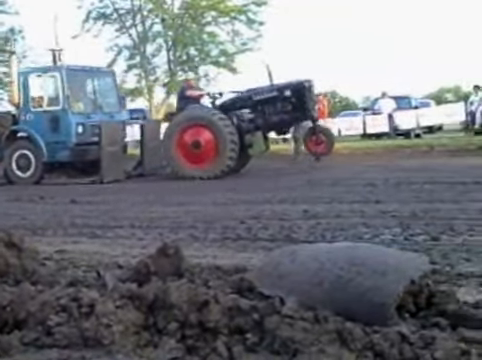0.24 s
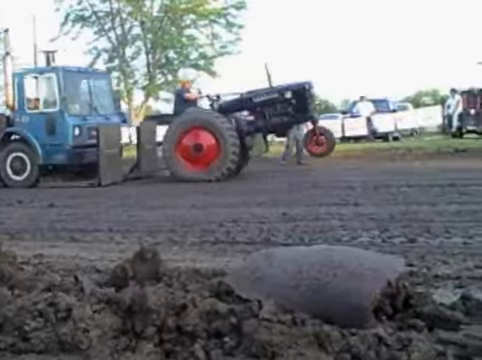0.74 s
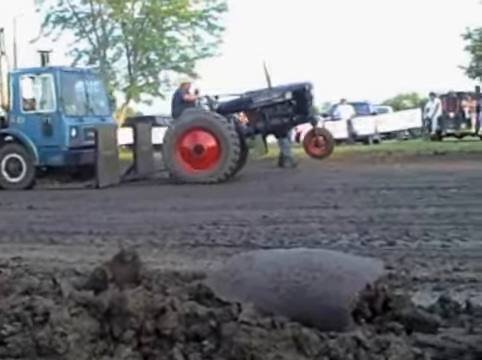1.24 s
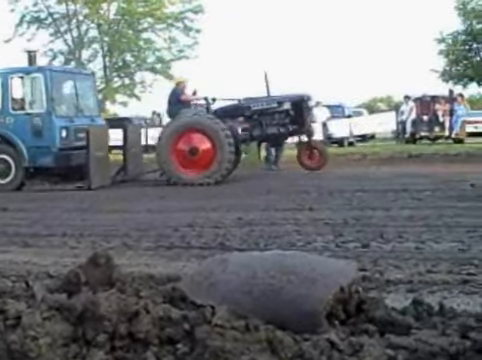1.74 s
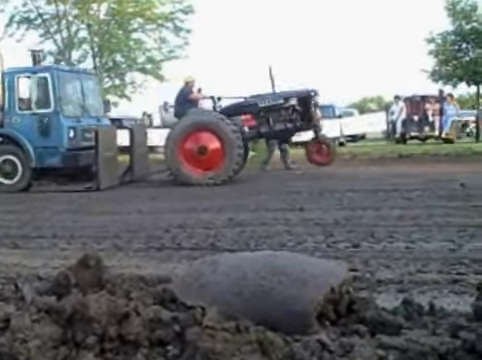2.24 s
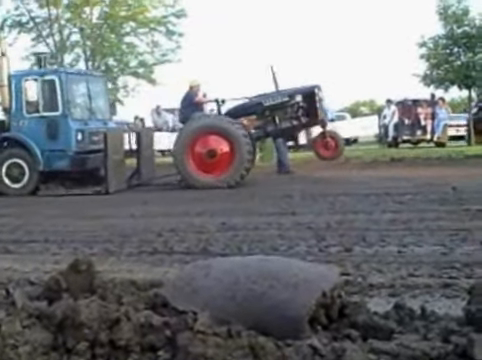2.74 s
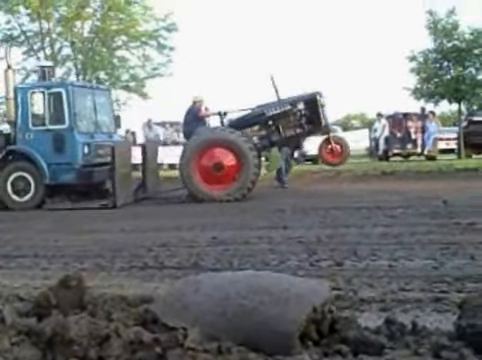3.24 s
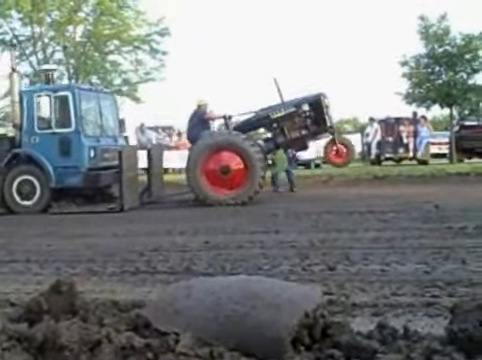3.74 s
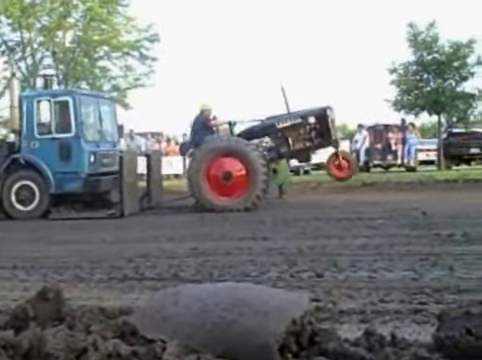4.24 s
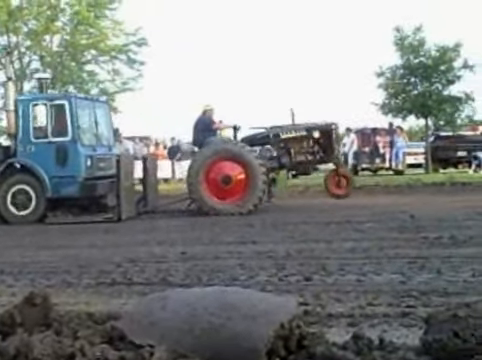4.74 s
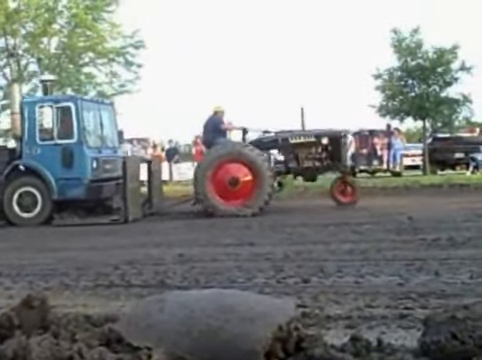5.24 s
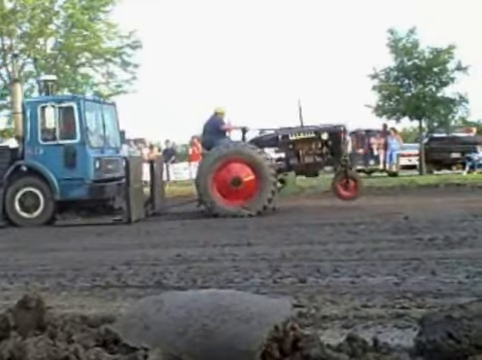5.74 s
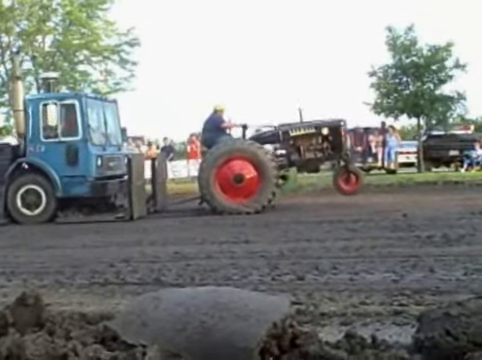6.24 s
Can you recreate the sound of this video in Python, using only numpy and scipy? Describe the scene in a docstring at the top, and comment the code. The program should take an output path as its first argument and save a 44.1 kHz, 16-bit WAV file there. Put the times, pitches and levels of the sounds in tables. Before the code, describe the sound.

An old tractor pulls a heavy sled along an outdoor dirt track, heard from the side on a small camera microphone. The exhaust starts as a loud, low, rasping drone, rallies briefly, then slows and weakens into separate thumps, nearly stalling. The sled rumbles underneath throughout, while light metallic clinks, short scrapes and a thin high hiss ride on top.

```python
"""Beside a dirt track, on a small camera microphone: an old tractor drags a rumbling weight sled.
It starts at full blow, each firing thumping the exhaust stack into a low ring and blowing out a rasping
puff of gas that rings in the pipe; metallic clinks, scrapes and a narrow hiss ride on top.
The speed sinks, rallies briefly before 2 s and sinks again, and the exhaust weakens with it.
A deep rumble swells around 5 s, and the engine lugs down to separate thumps, almost to a stall."""
import sys
import numpy as np
from scipy import signal
from scipy.fft import rfft, irfft, next_fast_len
from scipy.io import wavfile
from scipy.ndimage import uniform_filter1d

SR = 44100
rng = np.random.default_rng(int(sys.argv[2]) if len(sys.argv) > 2 else 0)


def wav_out(sig):
    """Save sig, one row per channel (or a flat mono array), as 16-bit PCM at SR to the path in sys.argv[1]."""
    wavfile.write(sys.argv[1], SR, np.round(np.clip(np.atleast_2d(sig).T, -1, 1) * 32767).astype(np.int16))


N = 286629
TIME = np.arange(N) / SR
CUTOFF_HZ = 7230   # top of the microphone's main band
SHOCK_LEAD_S = .0012   # the shock reaches the stack mouth this long before the slug of gas


def from_db(db):
    """Decibels to gain."""
    return 10 ** (np.asarray(db) / 20)


def rms_one(x):
    """Scale to unit rms."""
    return x / np.sqrt(np.mean(x ** 2) + 1e-20)


def in_time(rows):
    """A sample-by-sample curve through rows of time_s, value."""
    return np.interp(TIME, *np.transpose(rows))


def levelled(x):
    """Even out the slow level and keep the single beats."""
    size = SR // 4
    power = uniform_filter1d(uniform_filter1d(x ** 2, size), size // 2)
    return x / np.sqrt(np.maximum(power, 1e-20))


def coloured(x, spectrum):
    """Filter by a curve of frequency_hz, gain_db, with nothing above the cutoff; rms 1."""
    hz, db = np.transpose(spectrum)
    size = next_fast_len(N)
    bins = np.maximum(np.fft.rfftfreq(size, 1 / SR), 1)
    gain = from_db(np.interp(np.log(bins), np.log(hz), db)) * (bins < CUTOFF_HZ)
    return rms_one(irfft(rfft(x, size) * gain, size)[:N])


def resonance(x, hz, width_hz):
    """Two-pole resonance with gain 1 at its peak."""
    r = np.exp(-np.pi * width_hz / SR)
    feedback = [1, -2 * r * np.cos(2 * np.pi * hz / SR), r * r]
    return signal.lfilter(np.array([1, 0, -1]) * (1 - r * r) / 2, feedback, x)


def band_noise(low_hz, high_hz, order, samples=N):
    """Noise between two edges; rms 1."""
    sos = signal.butter(order, [low_hz, high_hz], "band", fs=SR, output="sos")
    return rms_one(signal.sosfilt(sos, rng.standard_normal(samples)))


def drift(per_s):
    """A smooth wander through per_s random values a second; rms 1."""
    points = rng.standard_normal(int(per_s * N / SR) + 2)
    wander = np.interp(TIME * per_s, np.arange(len(points)), points)
    return rms_one(uniform_filter1d(wander, int(SR / per_s / 2)))


def blowing(speed, full_hz=39.8, weakest_hz=12.5, db_per_octave=12):
    """How hard the engine blows, in dB against full blow: the slower it fires, the weaker."""
    return db_per_octave * np.log2(np.clip(speed, weakest_hz, full_hz) / full_hz)


def blowdown(turns, rise, fall, uneven_db):
    """Gas flow as a valve opens and its cylinder empties; rise and fall are shares of a firing interval."""
    nearest = np.round(turns).astype(int) + 2
    charge = rng.standard_normal(nearest.max() + 2)   # no two charges burn alike
    flow = np.zeros(N)
    for earlier in range(2):
        age = turns - np.round(turns) + earlier
        shape = np.where(age < 0, np.exp(-(age / rise) ** 2), np.exp(-np.abs(age) / fall))
        flow += from_db(uneven_db * charge[nearest - earlier]) * shape
    return flow


def swell(peak_s=4.97, width_s=1, level_db=-29):
    """One deep swell of rumble, perhaps a gust on the microphone."""
    shape = np.exp(-((TIME - peak_s) / width_s) ** 2)
    return from_db(level_db) * shape * band_noise(27, 52.5, order=2)


def sled():
    """The weight sled rumbles as it drags through the dirt."""
    # loudness of the dragging: time_s, level_db
    drag = [(0, -20.5), (2, -29), (3.8, -26), (4.6, -29.5), (5.7, -35.5), (6.5, -31.5)]
    # colour of the sled in the dirt: frequency_hz, gain_db
    rumble = [(10, -10.5), (24, -12.5), (36, -1), (55, -0.5), (85, 1), (115, -5.5), (170, -13.5),
              (260, -18.5), (400, -20), (800, -26.5), (2000, -27.5), (7000, -37.5)]
    return from_db(in_time(drag)) * coloured(rng.standard_normal(N), rumble)


def hiss(turns, speed, blur_hz=36):
    """A narrow bright hiss that pulses with the firings once they come slowly."""
    # loudness of the hiss: time_s, level_db
    loudness = [(0.05, -28.5), (1.92, -30.5), (2.1, -27.5), (3.51, -33.5), (3.74, -38), (4.06, -32.5),
                (6.29, -44.5), (6.45, -44)]
    pulses = blowdown(turns, rise=.33, fall=.24, uneven_db=3)
    steady = .2 + (speed / blur_hz) ** 4
    pulsing = np.hypot(pulses, steady) * band_noise(6370, 8600, order=12)
    return from_db(in_time(loudness)) * levelled(pulsing)


def scrapes(turns, chatter_db=3):
    """Brief, chattering metal scrapes, probably from the sled and its hitch, tugged by the firings."""
    # metal sliding on metal: start_s, length_s, level_db
    slides = [(0.40, .08, -34), (2.29, .14, -39), (2.55, .22, -38), (5.15, .06, -40), (5.26, .13, -45),
              (5.70, .08, -44), (5.98, .07, -46)]
    shape = sum(from_db(db) * np.exp(-(2 * (TIME - s) / length - 1) ** 4) for s, length, db in slides)
    tugs = 1 + blowdown(turns, rise=.15, fall=.2, uneven_db=2)
    grain = from_db(chatter_db * drift(per_s=90)) * band_noise(4400, 5950, order=3)
    return shape * rms_one(tugs * grain)


def faint_clinks(blow_db, per_s=4):
    """Random clinks that fade with the engine: time_s, relative_db, centre_hz, half_width_hz."""
    gap_draw, pitch_draw = rng.random((60, 2)).T
    times = np.cumsum(-np.log(1 - gap_draw)) / per_s
    pitches_hz = 5200 + 400 * (2 * pitch_draw - 1)
    return [(s, -34 + np.interp(s, TIME, blow_db), hz, 800)
            for s, hz in zip(times, pitches_hz) if s < TIME[-1]]


def clinks(blow_db, rise_s=.0035, fall_s=.009, gain_db=3.5, ring_db=-6):
    """Short metallic clinks: each a burst of noise with a narrow ring at its centre."""
    # the main clinks: time_s, relative_db, centre_hz, half_width_hz
    strikes = [(0.141, -28, 5150, 990), (0.252, -29, 5150, 900), (0.525, -33, 5370, 800),
               (0.590, -29, 5800, 446), (0.637, -27, 5000, 545), (0.701, -42, 5800, 450),
               (0.793, -33, 5200, 686), (0.910, -28.5, 5200, 900), (1.049, -30, 5550, 710),
               (1.309, -28, 5770, 710), (1.388, -31, 5400, 1000), (1.432, -27.5, 5570, 510),
               (1.510, -32, 5160, 1110), (1.535, -28.5, 4830, 800), (1.614, -33, 4900, 900),
               (1.660, -32, 5240, 910), (2.079, -32, 5400, 700), (2.180, -37, 5330, 700),
               (2.229, -26, 4960, 595), (2.422, -27.5, 5650, 800), (2.620, -37, 5300, 700),
               (2.653, -34, 5340, 790), (3.222, -34, 4440, 1400), (3.386, -35, 4800, 500),
               (3.417, -33, 5040, 607), (3.842, -33.5, 4870, 800), (4.061, -34, 5250, 750),
               (4.295, -30.5, 4900, 1110), (4.374, -41, 5200, 900), (4.460, -31, 5030, 1160),
               (4.589, -34, 5100, 740), (4.768, -44, 5300, 800), (5.094, -30, 4500, 1000),
               (5.407, -40, 4900, 596), (5.638, -36, 4670, 1200), (5.760, -54, 4900, 910),
               (5.883, -48, 4950, 1130), (5.949, -44, 5040, 650), (6.144, -46, 4750, 700)]
    out = np.zeros(N)
    age = np.arange(-SR // 50, SR // 20) / SR
    shape = np.where(age < 0, np.exp(-(age / rise_s) ** 2), np.exp(-np.abs(age) / fall_s))
    for s, db, hz, half_width_hz in list(strikes) + faint_clinks(blow_db):
        burst = band_noise(hz - half_width_hz, hz + half_width_hz, order=2, samples=len(age))
        ring = rms_one(resonance(burst, hz, width_hz=110))
        at = np.clip(np.round((s + rise_s / 2 + age) * SR).astype(int), 0, N - 1)
        out[at] += from_db(gain_db + db) * shape * rms_one(burst + from_db(ring_db) * ring)
    return out


def over_ground(x):
    """On the way to the microphone, the reflection off the track cancels two bands by a wavering depth."""
    # cancelled bands: centre_hz, width_hz
    dips = [(390, 197), (1225, 130)]
    for hz, width_hz in dips:
        depth = np.clip(.66 + .76 * drift(per_s=9), 0, 1)
        x = x - depth * resonance(x, hz, width_hz)
    return x


def hollow(x, lowest_hz=1230, spacing_hz=150):
    """Narrow dips come and go at random, giving the engine and sled sound a watery, hollow tone."""
    for hz in lowest_hz + spacing_hz * np.arange(19):
        depth = np.clip(3 * drift(per_s=20) - .8, 0, 1)
        for _ in range(2):
            x = x - depth * resonance(x, hz, width_hz=105)
    return x


def bark_accents(turns):
    """Gain over the single firings that bark harder or softer than the rest."""
    # accented firings: time_s, gain_db
    accents = [(1.122, 2.5), (2.625, -2.5), (2.975, 0.5), (3.006, -0.5), (3.488, -1), (3.521, 0.5),
               (3.805, 3.5), (4.339, 0), (4.379, 2.5), (4.677, 2.5), (4.903, 1), (5.304, 4.5), (5.64, -2.5)]
    accent_db = np.zeros(N)
    for s, db in accents:
        age = turns - np.round(np.interp(s, TIME, turns))
        accent_db += db * np.exp(-(age / .35) ** 2)
    return from_db(accent_db)


def pipe_ring(turns, speed, uneven_db=2, scatter_s=.004, swell_s=.002):
    """The shock of each firing rings the modes of the pipe, each with its own strength: a coarse rattle."""
    # modes of the exhaust pipe: pitch_hz, width_hz, relative_db
    modes = [(556, 190, -1), (768, 120, -2), (1066, 77, -6.5), (1370, 77, -3), (1677, 110, -7.5),
             (1917, 150, -4), (2250, 120, -2), (2528, 130, -2.5), (2817, 210, -3.5), (3143, 160, -5.5),
             (3437, 78, -2.5)]
    early_turns = turns + (SHOCK_LEAD_S + scatter_s + swell_s) * speed
    firings = np.flatnonzero(np.diff(np.floor(early_turns)) > 0)
    out = np.zeros(N)
    for hz, width_hz, db in modes:
        late, size, sign = rng.uniform(-1, 1, (3, len(firings)))
        shocks = np.zeros(N)
        at = np.clip(firings + (scatter_s * SR * (1 + late) / 2).astype(int), 0, N - 1)
        shocks[at] = np.sign(sign) * from_db(db + uneven_db * size)
        # twice through the mode: the ring swells before it dies, which rounds the bark
        out += resonance(resonance(shocks + 1e-18, hz, width_hz), hz, width_hz) / np.sqrt(width_hz)
    return levelled(out) * bark_accents(turns)


def pipe_echoes(x, return_db=-13.5):
    """Round trips in the pipe give evenly spaced ringing peaks, which waver with the heat of the gas."""
    trip_s = .00363 + .0001 * drift(per_s=15)
    out = x
    for _ in range(4):
        delayed = np.interp(TIME - trip_s, TIME, x, left=0)
        x = from_db(return_db) * uniform_filter1d(delayed, 6)   # duller on every trip
        out = out + x
    return out


def cracks(turns, speed, rise_s=.0018, fall_s=.004, peak_shocks_per_s=2500):
    """Each puff opens with a short, dense volley of small shocks; rms 1."""
    front = np.sqrt(blowdown(turns, rise=rise_s * speed, fall=fall_s * speed, uneven_db=2))
    born = rng.random(N) < peak_shocks_per_s * front / SR
    return rms_one(born * front * rng.choice([-1, 1], N) * rng.uniform(.96, 1, N))


def rasp(turns, speed, blow_db):
    """The jet at the stack mouth: each firing gives a crack, a turbulent puff and a weaker second puff."""
    # colour of the gas puffs: frequency_hz, gain_db
    puff_colour = [(270, 5.5), (400, -1), (520, 4.5), (780, 3.5), (950, -4), (1100, 2), (1230, 2),
                   (1400, 3), (1700, 1), (2600, 0.9), (3500, 1), (3900, -1), (4180, -17), (4450, -5.5),
                   (5200, -6), (7200, -11.5)]
    pace = speed / speed.max()
    # the jet breaks up a little sooner or later on every firing
    ragged = turns + SHOCK_LEAD_S * speed + .02 * drift(per_s=40) * pace
    puff = blowdown(ragged, rise=.155, fall=.17, uneven_db=.5)
    afterpuff = .4 * pace * blowdown(ragged - .24, rise=.06, fall=.25, uneven_db=1)
    between = .64 * pace ** .92   # at low speed the flow nearly stops between puffs
    crack = from_db(-9 - .055 * blow_db) * cracks(ragged, speed)
    turbulence = rms_one(np.hypot(puff + afterpuff, between) * rng.standard_normal(N))
    jet = (turbulence + crack) * bark_accents(turns)
    # as the engine weakens, its barks gain edge and body
    edge_db, body_db = -.63 * blow_db, -.2 * blow_db
    jet += (from_db(edge_db) - 1) * resonance(jet, hz=3100, width_hz=2500)
    jet += (from_db(body_db) - 1) * resonance(jet, hz=620, width_hz=540)
    return levelled(coloured(pipe_echoes(jet), puff_colour))


def boom(turns, speed, blow_db, lug_hz=25, churn_db=4):
    """Slugs of gas ring the air column of the stack: a drone at speed, separate thumps when lugging."""
    # low resonances of the stack: pitch_hz, width_hz, gain_db
    stack = [(68.5, 5, -4.3), (83.7, 11.6, 3), (104, 9.2, -25), (126.3, 18, -15)]
    # upper resonances that sound under hard blowing: pitch_hz, width_hz, gain_db
    blare = [(154, 27, -13), (216.2, 11, -7), (256.3, 33, -4)]
    lugging = np.minimum(lug_hz / speed, 1) ** 3
    slugs = blowdown(turns, rise=.09, fall=.12, uneven_db=-.4 * lugging)
    # ragged gas flow keeps the stack ringing while the engine lugs
    churn = from_db(churn_db) * lugging ** 2 * rng.standard_normal(N)
    flow = slugs - slugs.mean() + churn
    low = sum(from_db(db) * resonance(flow, hz, width) for hz, width, db in stack)
    upper = sum(from_db(db) * resonance(flow, hz, width) for hz, width, db in blare)
    steepness = from_db(6.1 * blow_db)   # strong pulses steepen on their way up the pipe
    return -(low + steepness * upper)


def scene():
    """The labouring engine and its sled from the trackside; speed sets the strength of the exhaust."""
    # engine speed, sinking under the load with one brief recovery: time_s, firing_rate_hz
    slowdown = [(0.0, 45.4), (0.1, 44.83), (0.79, 43.86), (1.11, 42.3), (1.48, 39.63), (1.82, 42.15),
                (2.41, 35.29), (2.8, 34.46), (3.64, 28.27), (4.3, 25.13), (4.52, 23.46), (5.01, 20.94),
                (5.48, 17.32), (5.94, 15.9), (6.15, 14.2), (6.5, 9.3)]
    speed = in_time(slowdown)
    blow_db = blowing(speed)
    turns = np.cumsum(speed) / SR - .36   # whole numbers are firings
    engine = from_db(2 + .66 * blow_db) * boom(turns, speed, blow_db)
    engine += from_db(-25 + blow_db) * rasp(turns, speed, blow_db)
    engine += from_db(-33 + .78 * blow_db) * pipe_ring(turns, speed)
    pull = engine + sled()
    metal = clinks(blow_db) + scrapes(turns)
    return (hollow(over_ground(pull)) + metal + hiss(turns, speed) + swell())[None]


def record(dry, ceiling=.58, leak_db=-28.5, leak_top_hz=9000):
    """A small camera microphone: no deep bass, peaks rounded, a steep top cut with a faint leak above."""
    thinned = signal.sosfilt(signal.butter(2, 22, "high", fs=SR, output="sos"), dry)
    rounded = thinned / (1 + (thinned / ceiling) ** 6) ** (1 / 6)
    cut = signal.sosfilt(signal.ellip(10, .2, 80, CUTOFF_HZ, fs=SR, output="sos"), rounded)
    leaky = cut + from_db(leak_db) * rounded
    return signal.sosfilt(signal.ellip(10, .2, 80, leak_top_hz, fs=SR, output="sos"), leaky)


dry = scene()
out = record(dry)
wav_out(out)
```